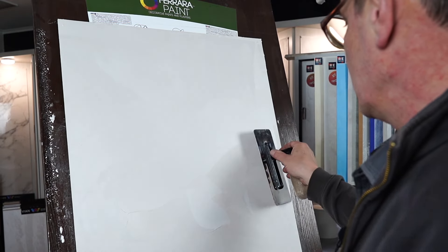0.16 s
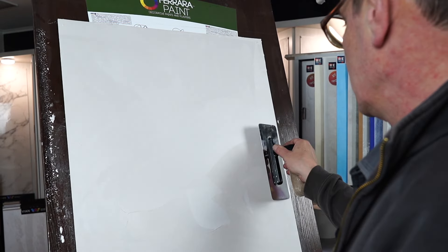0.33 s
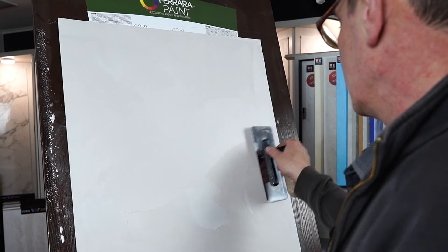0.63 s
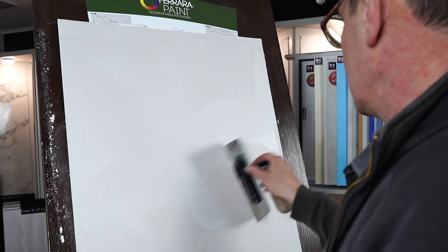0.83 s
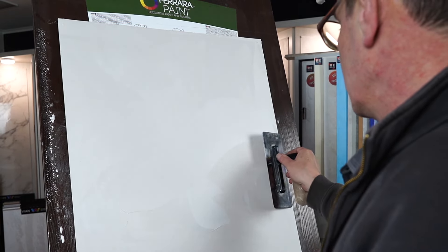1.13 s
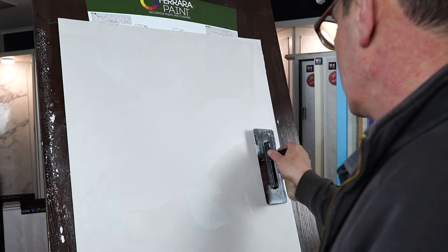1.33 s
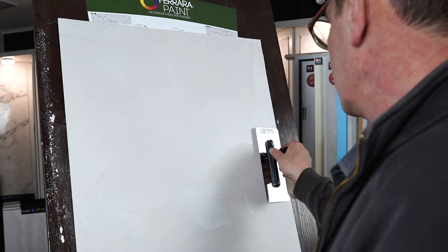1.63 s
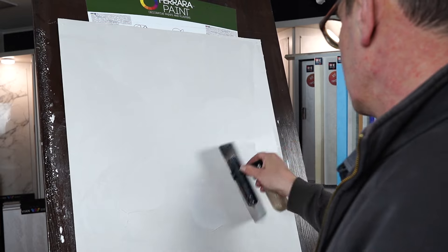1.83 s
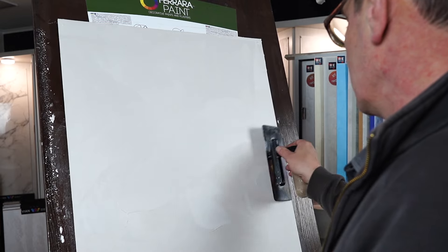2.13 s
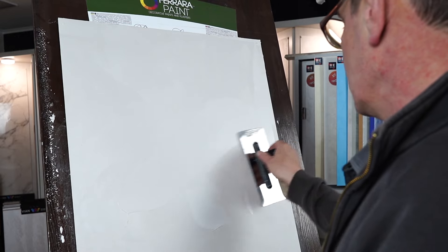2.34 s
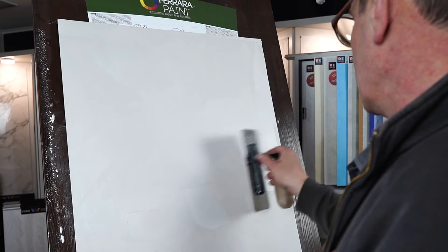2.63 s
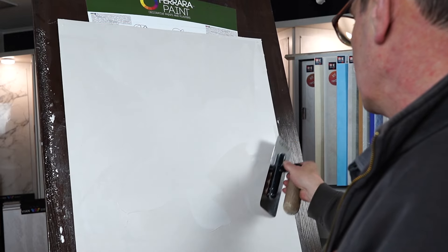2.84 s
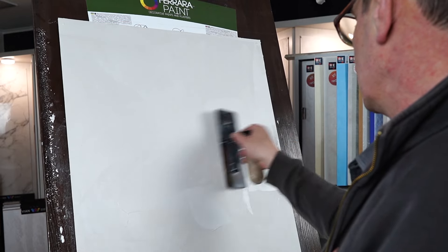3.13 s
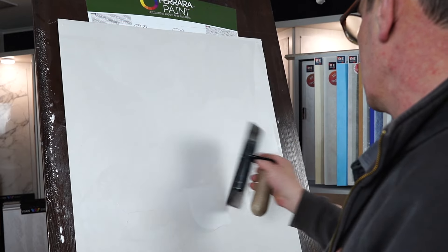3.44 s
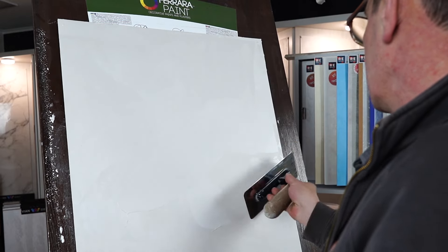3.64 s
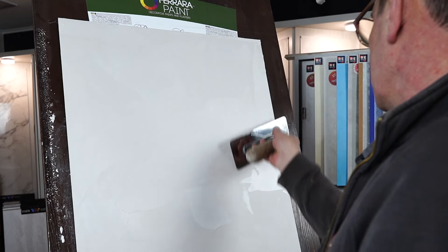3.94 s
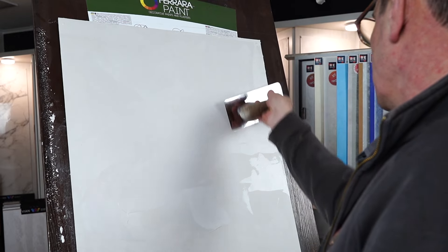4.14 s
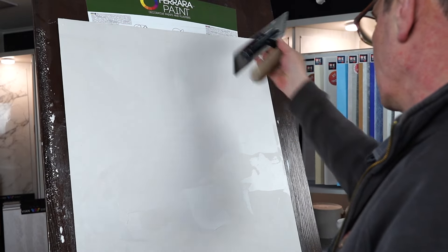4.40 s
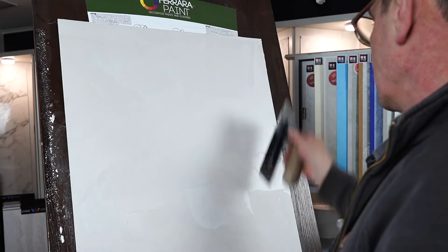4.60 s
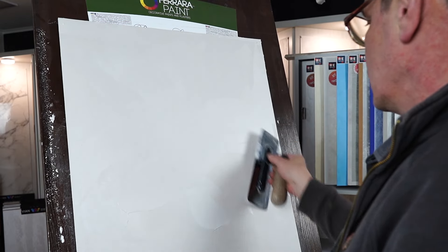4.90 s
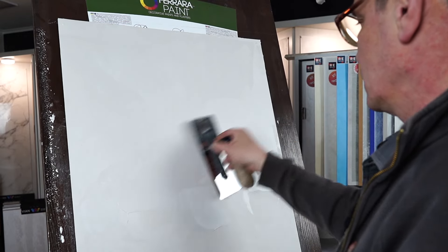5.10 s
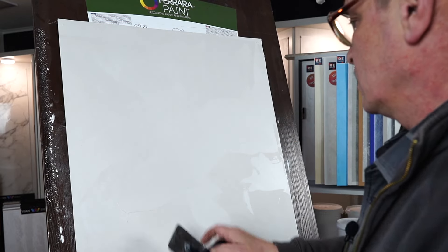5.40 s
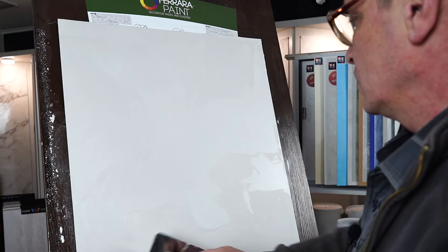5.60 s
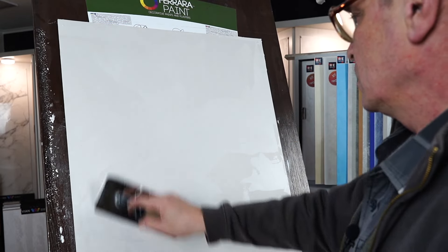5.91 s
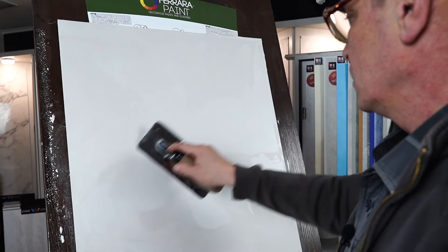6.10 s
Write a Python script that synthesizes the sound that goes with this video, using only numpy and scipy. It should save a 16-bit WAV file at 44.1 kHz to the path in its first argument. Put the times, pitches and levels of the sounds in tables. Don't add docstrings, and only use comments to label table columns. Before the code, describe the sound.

Close to the microphone, a thin steel blade taps a board, then makes brief rasping strokes with short gaps. Pressed passages sound rough and nasal, lighter ones hiss softly. A double clack just before four seconds starts a longer, uneven scraping; another knock begins a sustained rub near five, and a firm clack near the end leads into the last slide. Small room reverberation and quiet low rumble surround it.

```python
import sys
import numpy as np
from scipy import signal
from scipy.io import wavfile

SR = 44100
rng = np.random.default_rng(int(sys.argv[2]) if len(sys.argv) > 2 else 0)


def gain_from_db(level_db):
    decades = np.asarray(level_db, float) / 20
    return 10 ** decades


def master(y):
    cut = np.clip(np.atleast_2d(y).T, -1, 1)
    pcm = np.round(cut * 32767)
    wavfile.write(sys.argv[1], SR, pcm.astype(np.int16))


N = 275889

# (time [s], peak [dB], knock [Hz], crack [dB], thud [dB])
KNOCK_EVENTS = [(0.203, -15, 2400, -13.5, -30), (0.493, -37.5, 970, -20, -4), (1.06, -30.5, 2200, -28, -22),
                (1.066, -36.5, 1070, -24, -25), (1.306, -38.5, 960, -19, -17),
                (1.521, -41.5, 1260, -3, -18), (1.658, -47, 1510, -20, -8.5), (1.7, -46.5, 1950, -1, 3),
                (2.16, -23.5, 2030, -39, -36), (2.181, -20.5, 1870, -29, -27),
                (2.206, -24, 1670, -29, -12.5), (2.306, -32, 2200, -30, -27),
                (2.718, -38.5, 2130, -11, -28.5), (2.874, -14, 1940, -25, -24), (3.703, -10, 966, -16, -20),
                (3.742, -3.5, 2130, -20.5, -20), (4.403, -24.5, 735, -8.5, -29),
                (4.786, -9, 1260, -16, -26), (5.499, -53, 2110, -2.5, -16), (5.59, -48, 1680, -12, -24),
                (5.761, -10, 1450, -55, -35), (5.786, -7.5, 1500, -13.5, -22.5)]
# (frequency [Hz], level [dB], t60 [s])
FREE_BLADE_MODES = [(470, -8, .3), (745, 0, .3), (942, -4, .3), (1045, -8, .25), (1215, 0, .3),
                    (1545, -8, .25), (1675, 0, .4), (1870, -6, .3), (2100, -2, .35), (2200, -4, .45),
                    (2350, -5, .3), (2495, 0, .4), (2920, 0, .3), (3415, -2, .4), (3820, -3, .2),
                    (4110, -6, .15), (5200, -6, .15), (6300, -6, .12)]
# (frequency [Hz], level [dB], t60 [s])
BOARD_MODES = [(52.3, -6.5, .3), (65, -1.5, 0.204), (80.2, 2, 0.13), (137.4, -4.5, 0.23), (236, -4, .08),
               (358, -1, 0.13), (700, -19, 0.044)]
# (begin [s], extra hiss of a drier board [dB], blade resonance shift [Hz])
STROKE_STARTS = [
    (-.1, 0.1, 1),
    (.6, 0, 0),
    (1.184, -1, 50),
    (1.762, -1, 3),
    (2.285, 2, 28),
    (2.875, -1, 60),
    (3.705, -1, 5.5),
    (4.788, -1, 32),
    (5.76, 1, -120),
]


def at_hz(points, hz, column=1):
    points = np.array(points)
    return np.interp(np.log(hz), np.log(points[:, 0]), points[:, column])


def rms_one(x):
    return x / np.sqrt(np.mean(x ** 2) + 1e-20)


def drift(rate_hz):
    r = np.exp(-2 * np.pi * rate_hz / SR)
    wander = signal.lfilter([1], [1, -2 * r, r * r], rng.standard_normal(N + SR))
    return rms_one(wander[SR:])


def ring(clicks, hz, t60):
    r = gain_from_db(-60 / (t60 * SR))
    w = 2 * np.pi * hz / SR
    return signal.lfilter([0, np.sin(w)], [1, -2 * r * np.cos(w), r * r], clicks + 1e-18)


def bands(x, low_hz, high_hz):
    edges = np.geomspace(low_hz, high_hz, int(3 * np.log2(high_hz / low_hz)) + 1)
    for k, (low, high) in enumerate(zip(edges, edges[1:])):
        slicer = signal.butter(2, [low, high], "band", fs=SR, output="sos")
        yield np.sqrt(low * high), signal.sosfilt(slicer, x[k % 2])


def coloured(x, spectrum, patchy_db):
    total = 0
    for hz, band in bands(x, spectrum[0][0], spectrum[-1][0]):
        total = total + gain_from_db(at_hz(spectrum, hz) + patchy_db * drift(18)) * band
    return rms_one(total)


def still_air():
    # (frequency [Hz], level [dB per Hz])
    rumble = [(14, -18), (24, 7), (49, 0.5), (101, -10.5), (209, -11), (350, -23.5), (459, -16.5),
              (653, -27), (747, -22), (2090, -33.5), (3140, -35), (13500, -43), (15500, -39)]
    return gain_from_db(-49) * coloured(rng.standard_normal((2, N)), rumble, patchy_db=0.5)


def held(s, length_s, level_db, rise_db_per_s):
    lift_db_per_s, silence_db = 705, -120.0
    t = np.arange(0, N + 32, 32) / SR
    out = silence_db
    for start, length, top, rise in np.broadcast(s, length_s, level_db, rise_db_per_s):
        rising_db = rise * np.maximum(start - t, 0)
        lifting_db = lift_db_per_s * np.maximum(t - start - length, 0)
        stroke_begin = max(row[0] for row in STROKE_STARTS if row[0] <= start + .006)
        touch = np.where(t >= stroke_begin, top - rising_db - lifting_db, silence_db)
        out = np.maximum(out, touch)
    return np.interp(np.arange(N) / SR, t, out)


def lingering(level_db, under_db, dying_db_per_s):
    slope = dying_db_per_s * np.arange(N) / SR
    tail = np.maximum.accumulate(level_db + under_db + slope) - slope
    return np.maximum(level_db, tail)


def hand():
    # (time [s], length [s], edge hiss [dB], blade [dB], board [dB])
    glides = [(-0.05, 0.14, -81, -67.5, -59), (0.655, 0.049, -51.5, -55, -56), (0.75, 0.042, -36, -30, -50),
              (1.187, 0.38, -60.5, -59, -80), (1.204, 0.11, -55.5, -54.5, -57.5),
              (1.516, 0.03, -56, -63, -58), (1.6, 0.1, -65, -62.5, -74), (1.697, 0.12, -45, -58, -52.5),
              (1.833, 0.02, -35.5, -30, -50), (2.19, 0.2, -64, -67, -50), (2.299, 0.19, -42.5, -51, -48),
              (2.374, 0.043, -38, -45, -45), (2.455, 0.02, -31, -32, -48), (2.879, 0.024, -61, -53, -42.5),
              (2.944, 0.24, -52, -46, -60), (3.706, .03, -75, -43, -60), (3.745, 0.33, -51, -40.5, -41.5),
              (4.034, 0.39, -53.5, -45.5, -44.5), (4.36, 0.1, -55.5, -51, -51),
              (4.437, 0.23, -67.5, -67, -70.5), (4.83, .06, -49.5, -40, -59),
              (4.874, 0.16, -47, -39.5, -42.5), (5.786, .14, -45.5, -30, -38.5),
              (6.0, 0.25, -55, -35.5, -47)]
    # (time [s], length [s], blade [dB], rise [dB per s], board [dB])
    presses = [(0.717, 0.073, -20.5, 494, -37), (1.22, 0.039, -54, 202, -64),
               (1.779, 0.051, -22, 1200, -38), (1.848, 0.023, -19, 168, -55), (2.39, .015, -33, 273, -34.5),
               (2.477, 0.029, -19.5, 597, -35.5), (3.007, 0.021, -28, 320, -38),
               (3.07, 0.08, -29, 123, -40.5), (3.185, 0.081, -18.5, 150, -51),
               (3.267, 0.064, -33.5, 300, -39), (3.805, 0.017, -33.5, 188, -35.5),
               (3.891, 0.016, -33, 170, -37), (3.96, 0.04, -36, 170, -40), (4.246, 0.064, -36, 250, -40),
               (4.314, 0.028, -30.5, 129, -36), (4.894, 0.014, -31.5, 167.5, -61),
               (5.064, 0.033, -28.5, 73, -41), (5.115, .13, -20, 164, -42), (5.76, 0.0045, -20, 3000, -53),
               (5.926, 0.059, -23.5, 101, -37), (6.163, 0.024, -39.5, 58, -42)]
    glide_rise_db_per_s = 1500

    s, length_s, glide_db, blade_db, board_db = np.transpose(glides)
    glide = held(s, length_s, glide_db, glide_rise_db_per_s)
    blade = held(s, length_s, blade_db, glide_rise_db_per_s)
    board = held(s, length_s, board_db, glide_rise_db_per_s)

    s, length_s, press_db, rise, board_db = np.transpose(presses)
    press = held(s, length_s, press_db, rise)
    board = np.maximum(board, held(s, length_s, board_db, rise))

    s, peak_db = np.transpose(KNOCK_EVENTS)[:2]
    landed = held(s + 0.0072, 0.0051, peak_db - 32.5, 9000.0)

    begins, dry_db, shift_hz = np.transpose(STROKE_STARTS)
    stroke = np.searchsorted(begins, np.arange(N) / SR) - 1
    pressed_hiss = press - 12.5 + dry_db[stroke]
    glide_hiss = glide - 4 + 0.09 * (glide + 45)
    hiss = np.maximum.reduce([pressed_hiss, glide_hiss, landed])
    airy = np.maximum(glide, press - 21)

    blade = lingering(np.maximum(blade, press), under_db=-28, dying_db_per_s=61)
    light_hz, sag_hz_per_db = 1914, 7
    blade_hz = light_hz + shift_hz[stroke] - sag_hz_per_db * (blade + 55)
    hiss = lingering(hiss, under_db=-8.5, dying_db_per_s=135)
    board = lingering(board, under_db=-5, dying_db_per_s=130)
    return blade, blade_hz, hiss, airy, board


def grit(per_s, spread_db, clump_db):
    sizes = gain_from_db(spread_db * np.minimum(rng.exponential(size=N), 4)) * rng.choice([-1, 1], N)
    struck = rng.random(N) < per_s / SR
    return rms_one(sizes * struck * gain_from_db(clump_db * drift(28)))


def moving_resonance(x, hz, width_hz):
    out, step = x.copy(), 256
    r = np.exp(-np.pi * width_hz / SR)
    for _ in range(2):
        state = np.zeros(2)
        for i in range(0, N, step):
            poles = [1, -2 * r * np.cos(2 * np.pi * hz[i] / SR), r * r]
            out[i:i + step], state = signal.lfilter([1, 0, -1], poles, out[i:i + step], zi=state)
    return rms_one(out)


def scrape():
    # (frequency [Hz], level [dB per Hz])
    hiss_spectrum = [(1940, 2), (3300, 14), (3470, 9.5), (4700, 5.5), (6380, 5.5), (7060, -1), (7550, -2),
                     (9000, -10.5), (11700, -49), (19800, -120)]
    # (frequency [Hz], level [dB per Hz])
    airy_spectrum = [(5000, -17.5), (6300, -3), (7600, -5), (9000, -1.5), (11500, -1.5), (14000, -1.5),
                     (15900, -11), (16200, -10)]
    # (frequency [Hz], level [dB per Hz])
    board_spectrum = [(88, -36), (150, -8), (190, -17.5), (312, -16.5), (391, -2), (600, -14.5), (820, -3),
                      (1200, -8), (1560, 0), (2640, -120)]

    blade_db, blade_hz, hiss_db, airy_db, board_db = hand()
    grains = grit(6000, spread_db=3.0, clump_db=1.5)
    blade = moving_resonance(grains, blade_hz, width_hz=1097)
    blade = signal.sosfilt(signal.butter(6, 2700, fs=SR, output="sos"), blade)
    streaks = 0
    for hz, mode_db, t60 in FREE_BLADE_MODES:
        streaks = streaks + gain_from_db(mode_db / 2 + 2.4 * drift(13.0)) * ring(blade, hz, 0.33 * t60)
    driven = gain_from_db(blade_db) * (blade + gain_from_db(-16) * rms_one(streaks))

    smooth = grit(20000, spread_db=1.5, clump_db=0.2)
    rough = grit(20000, spread_db=4.5, clump_db=1.5)
    hiss = gain_from_db(hiss_db) * coloured([smooth, rough], hiss_spectrum, patchy_db=3.25)
    airy = gain_from_db(airy_db) * coloured([smooth, rough], airy_spectrum, patchy_db=-2.85)

    board = gain_from_db(board_db) * coloured([grains, smooth], board_spectrum, patchy_db=4.5)
    rub = gain_from_db(board_db) * rough
    boom = sum(gain_from_db(-53.0 + level_db) * ring(rub, hz, t60) for hz, level_db, t60 in BOARD_MODES)
    return driven + hiss + airy + board + boom


def rings():
    # (time [s], level [dB], favoured [Hz], width [octaves], share of the free decay [ratio])
    touches = [
        (0.2022, -27.5, 770, 0.56, 0.32),
        (0.2044, -26.5, 1210, 0.092, 0.34),
        (.2025, -19, 2270, 0.2, 0.1),
        (.73, -30, 3400, .1, 0.33),
        (3.29, -58, 1710, .4, 1.),
        (4.32, -30.5, 3380, 0.7, .3),
        (4.336, -35.5, 1273, 1, 0.55),
        (4.455, -56.5, 2750, 0.46, 0.9),
        (5.571, -49.5, 1900, 0.32, 0.89),
        (5.69, -53, 3750, 0.14, .4),
    ]
    tap_s, brush_s = .0015, .018
    out, t = np.zeros(N + SR), np.arange(SR // 2) / SR
    for s, level_db, around_hz, octaves, share in touches:
        at_landing = min(abs(s - row[0]) for row in KNOCK_EVENTS) < .005
        swell = np.minimum(t / (tap_s if at_landing else brush_s), 1)
        at = round(s * SR)
        for (hz, mode_db, t60), turn in zip(FREE_BLADE_MODES, rng.random(len(FREE_BLADE_MODES))):
            away_db = -6 * (np.log2(hz / around_hz) / octaves) ** 2
            decay = gain_from_db(-60 * t / (min(share, 1) * t60))
            mode = swell * decay * np.sin(2 * np.pi * (hz * t + turn))
            out[at:at + len(t)] += gain_from_db(level_db + mode_db + away_db) * mode
    return out[:N]


def knocks():
    # (frequency [Hz], level [dB], t60 [s])
    pressed_modes = [(415, -26.5, 0.0073), (758, -63, 0.069), (1095, -27, 0.09), (1617, -13, 0.04),
                     (2076, 4, 0.0077), (2800, -19, 0.0083), (4430, -27.5, 0.063), (6520, -18, 0.008)]
    out, t, last = np.zeros(N + SR), np.arange(SR // 2) / SR, -1
    no_bass = signal.butter(2, 300, "high", fs=SR, output="sos")
    push = np.exp(-t / 0.00068) / (0.0011 * SR)
    for s, peak_db, knock_hz, crack_db, thud_db in KNOCK_EVENTS:
        chatter_ms = 2.6 if s - last < .05 else 3.5
        last = s
        chatter = rng.standard_normal(len(t)) * np.exp(-(600 * t / chatter_ms) ** 2)
        chatter[0] += 2.5

        knock = ring(chatter, knock_hz, .011)
        knock += sum(gain_from_db(db) * ring(chatter, hz, t60) for hz, db, t60 in pressed_modes)
        knock = signal.sosfilt(no_bass, knock)
        knock = knock / np.abs(knock).max()

        low_hz = 3500 * 2 ** np.clip((crack_db + 14) / 5, 0, 1.2)
        crack_band = signal.butter(1, [low_hz, 2.5 * low_hz], "band", fs=SR, output="sos")
        crack = gain_from_db(crack_db + 4) * signal.sosfilt(crack_band, chatter)

        thud = sum(gain_from_db(thud_db + db) * ring(push, hz, t60) for hz, db, t60 in BOARD_MODES)
        at = round(s * SR)
        out[at:at + len(t)] += gain_from_db(peak_db) * (knock + crack + thud)
    return out[:N]


def workshop(x):
    # (frequency [Hz], level [dB], t60 [s])
    room = [(150, -2, 0.74), (670, -5, 0.65), (2000, -13.5, 0.63), (5830, -4, 0.49), (14500, -8.5, 0.28)]
    echo_s, echo_db = .0075, -14.5
    t, tail = np.arange(SR) / SR, 0
    for hz, band in bands(rng.standard_normal((2, SR)), 40, 17000):
        t60 = at_hz(room, hz, column=2)
        height = gain_from_db(at_hz(room, hz)) * np.sqrt(6 * np.log(10) / (t60 * SR))
        tail = tail + height * band * gain_from_db(-60 * t / t60)
    tail = tail * (1 - np.exp(-t / 0.0073))
    tail[round(echo_s * SR)] += gain_from_db(echo_db)
    return signal.fftconvolve(x, tail)[:N]


def scene():
    trowel = scrape() + knocks() + rings()
    return (trowel + workshop(trowel) + still_air())[None]


def band_limit(x):
    return signal.sosfilt(signal.butter(12, 16660, fs=SR, output="sos"), x)


def record(dry):
    rounded = .6 * np.tanh(dry / .6)
    top_cut = signal.cheby2(12, 50, 16500, fs=SR, output="sos")
    return band_limit(signal.sosfilt(top_cut, rounded))


dry = scene()
out = record(dry)
master(out)
```